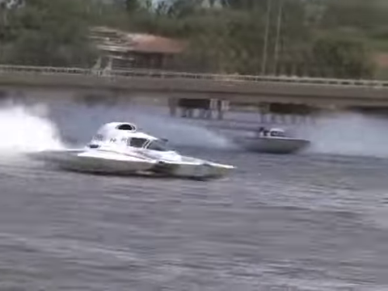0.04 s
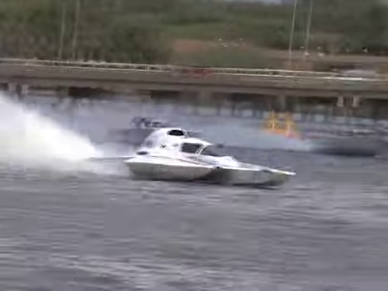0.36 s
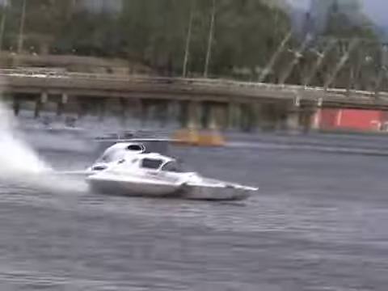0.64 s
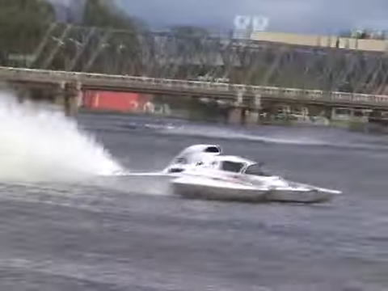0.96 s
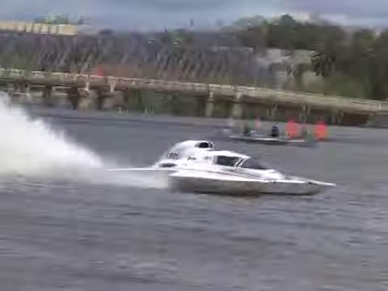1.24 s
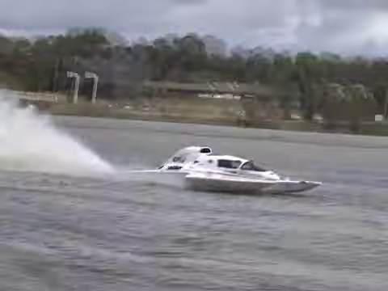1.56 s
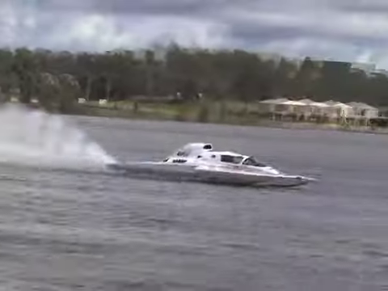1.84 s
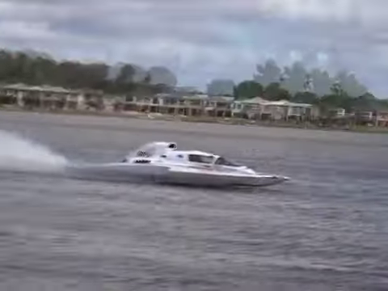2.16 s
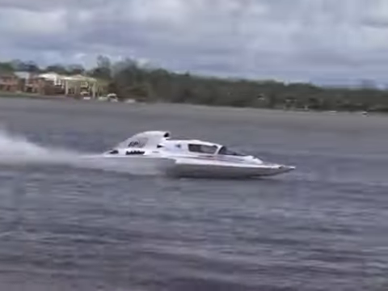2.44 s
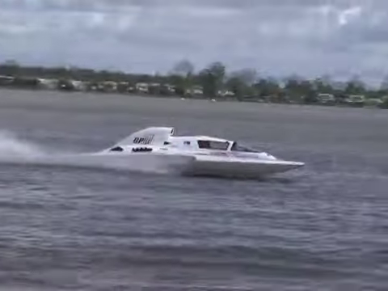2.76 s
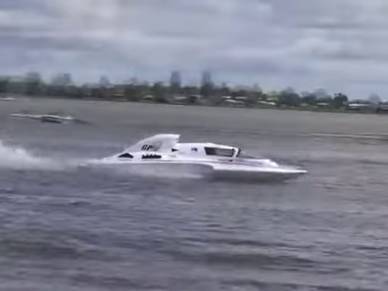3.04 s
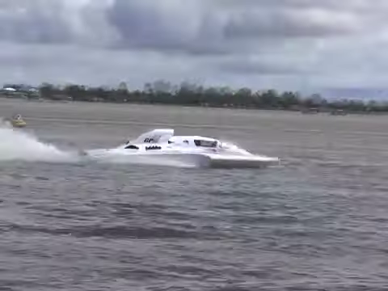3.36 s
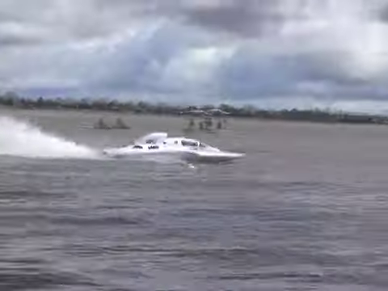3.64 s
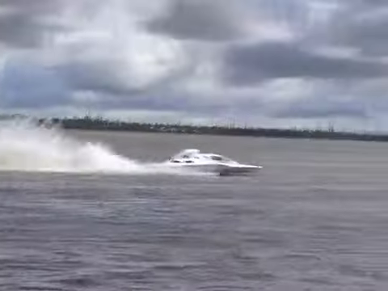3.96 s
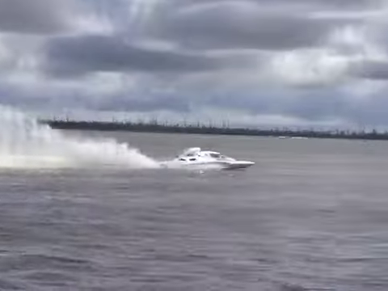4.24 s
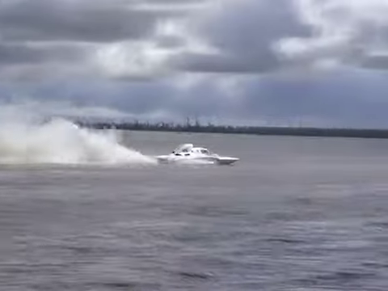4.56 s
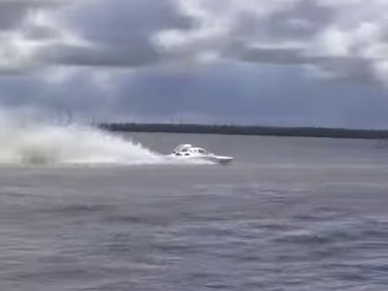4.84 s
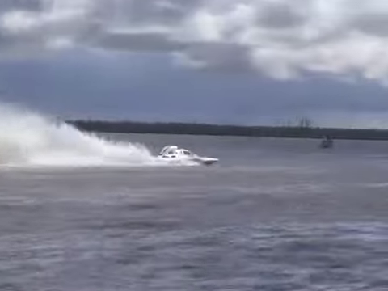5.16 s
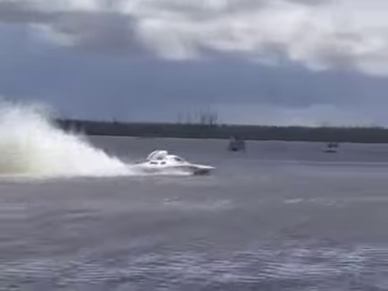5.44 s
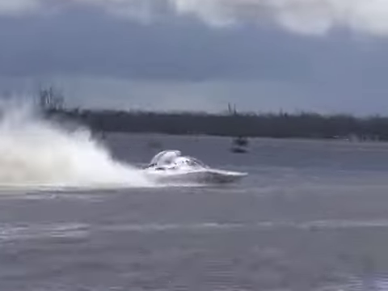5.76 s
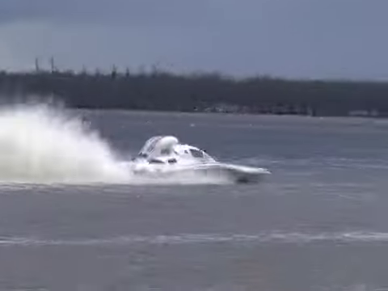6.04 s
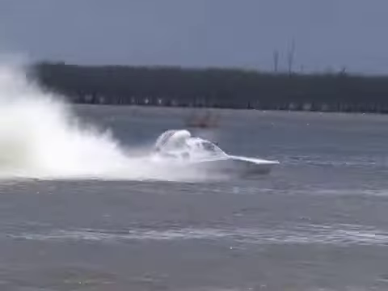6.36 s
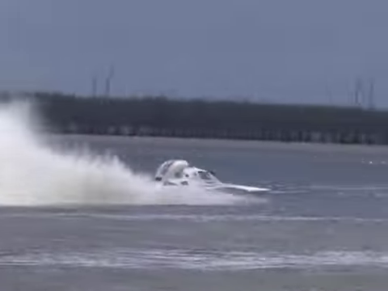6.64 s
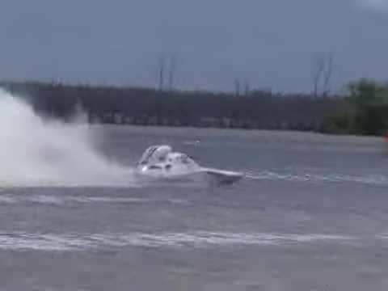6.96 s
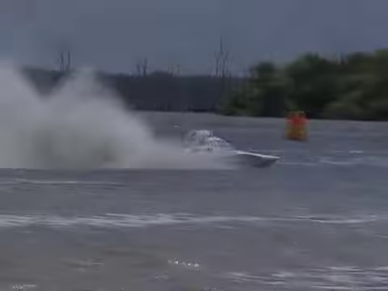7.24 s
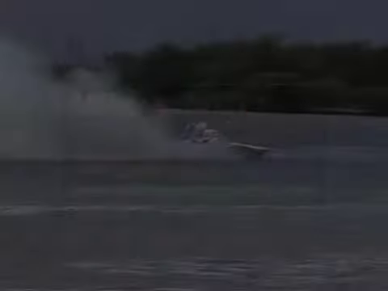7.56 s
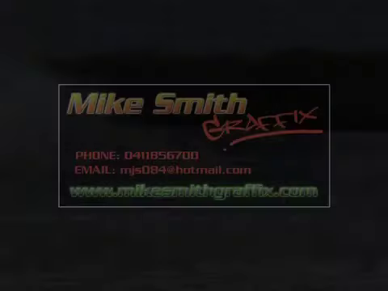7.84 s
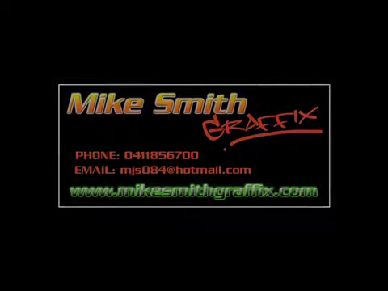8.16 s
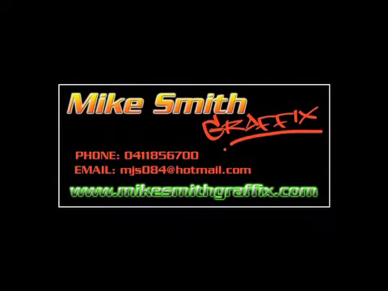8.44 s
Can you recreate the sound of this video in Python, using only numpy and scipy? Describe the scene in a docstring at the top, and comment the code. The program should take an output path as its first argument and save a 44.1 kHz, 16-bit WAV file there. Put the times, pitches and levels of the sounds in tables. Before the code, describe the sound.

A racing boat booms closer across a river, its revs jumping again and again. About halfway it passes: the pitch drops and the open exhaust crackles, then barks as it leaves. A second boat takes over with a steady drone, sheets of spray splash, something rattles briefly, and the sound fades out. The far bank echoes the engines, and a little wind rumbles on the microphone.

```python
"""A V8 racing boat booms closer on a river, its revs jumping each time the propeller lifts out.
Near 4 s it passes: the pitch falls, and its open exhaust pipes crackle, then bark as it leaves.
From about 5 s a second boat takes over with a steady drone. Sheets of spray splash after 6 s,
something rattles briefly, and the sound fades out. All along, the far bank echoes the boats
and a little wind rumbles."""
import sys
import numpy as np
from scipy import signal
from scipy.fft import rfft, irfft, next_fast_len
from scipy.io import wavfile
from scipy.ndimage import map_coordinates

SR = 44100
rng = np.random.default_rng(int(sys.argv[2]) if len(sys.argv) > 2 else 0)


def wrap_up_sound(samples):
    """Save the sound to the file named by the first command line argument, as 16-bit audio."""
    columns = np.atleast_2d(samples).T
    # keep every value between -1 and 1, then stretch to whole-number steps
    tamed = np.clip(columns, -1, 1)
    steps = np.round(tamed * 32767).astype(np.int16)
    wavfile.write(sys.argv[1], SR, steps)


N = 384111
TIME = np.arange(N) / SR

# When one side of a V8 fires, in eighths of an engine cycle
FIRING_EIGHTHS = np.array([0, 2, 3, 5])
# Which way the boat faces us, and how much duller its bark sounds when far away:
# time_s, side (0 front, 1 side-on, 2 back), dulling_db_per_harmonic
BOAT_VIEW = [(0, 0, -.3), (.7, 0, -.3), (1.0, 0, 0), (2.1, .1, 0), (2.7, .95, 0), (3.3, 1.1, 0),
             (3.9, 2, 0), (4.85, 2, -.1), (5.4, 2, -.9), (8, 2, -1.1)]
# Hiss of the exhaust jets: time_s, rasp_db, crackle_db, crackle_treble_db
JET_LEVELS = [(0, -23.5, -27.5, -6.5), (.7, -27.5, -28, -5.5), (.95, -24, -20.5, -7.5),
              (1.8, -24.5, -24, -1.5), (2.4, -27, -22.5, 1.5), (2.85, -22, -21, 2), (3.15, -26, -19, 2.5),
              (3.7, -21.5, -20.5, -1), (4.05, -22, -27.5, 1), (4.6, -29, -31, -1.5),
              (5.2, -32.5, -32.5, -6.5), (5.7, -30.5, -37.5, -6), (6.3, -32.5, -35, -12),
              (6.75, -31, -34.5, -16), (7.2, -35, -33.5, -11), (7.7, -32.5, -33, -14.5), (8, -25, -25, -26)]


def racing_boat():
    """The main boat: an engine note plus the noise of gas puffing out of its pipes."""
    surge_hz = propeller_surge()
    cycle_hz = 46.65 * doppler(speed_m_s=38.7, nearest_m=58.4, nearest_s=3.73) + surge_hz
    cycles = np.cumsum(cycle_hz * (1 + .003 * walk(30))) / SR
    tone = exhaust_tone(cycles, surge_hz)
    # Brief flare-ups of the exhaust: peak_s, half_length_s, rise_db
    flares = [(0, .05, 4), (.24, .07, 2.5), (0.488, .06, 6), (0.613, 0.062, 6.5), (1.1, .05, 1.5),
              (1.231, .04, 1), (1.4, .05, 1), (1.626, .06, 6), (2.12, .06, 5), (2.352, .04, 4),
              (2.505, .04, 3), (2.845, .08, 2), (3.15, .06, 5), (3.279, .03, 0), (3.5, .04, 4.5),
              (3.744, .05, 4.5), (4.344, .04, 1), (4.823, .06, 5), (5.1, .05, 3), (5.453, .05, 2),
              (5.79, .04, 4), (7.391, .07, 1)]
    flare_db = sum(rise_db * swell(peak_s, width_s) for peak_s, width_s, rise_db in flares)
    # Spray and water scatter the sound and blur the puffs: time_s, scattered_share (0 to 1)
    scattering = [(0, 0.18), (1.5, 0.28), (3.1, 0), (4.5, 0.16), (5.3, 0.6), (6.2, 0.56), (8, 0.5)]
    scattered, = curves(scattering)
    puffs = gas_puffs(cycles, decay_s=.0031, spread_db=1.48, jitter_s=.0001)
    flow = np.sqrt((1 - scattered) * puffs ** 2 + scattered)
    return tone + exhaust_roar(flow) + exhaust_rasp(puffs, surge_hz, flare_db) + crackle(flow, flare_db)


def propeller_surge():
    """Extra engine cycles a second: the revs race with the propeller out and drop as it bites again."""
    # Skips of the hull: start_s, length_s, gain_hz (negative where it digs in)
    skips = [(-.03, 0.13, 3), (.23, .06, 2.5), (.49, .17, 6.5), (.68, 0.067, -7.5), (.87, .12, 2.5),
             (.966, 0.041, 12.5), (1.267, .23, 4.5), (1.615, .07, 7), (1.737, .11, 7.5), (2.042, 0.12, 8.5),
             (2.41, .18, 7), (2.76, .22, 2.5), (2.93, .09, 5.5), (3.213, 0.067, 9), (3.38, 0.1, -2),
             (3.575, 0.067, 8), (3.76, .08, -1.5), (3.897, .11, 5.5), (4.262, .19, 5), (4.74, .1, 7),
             (5.32, 0.19, 4.5), (5.69, .33, 3), (6.232, .08, 7), (6.64, .2, 5), (7.415, 0.61, 3)]
    race_s, bite_s = .066, .072
    surge_hz = np.zeros(N)
    for start_s, length_s, gain_hz in skips:
        age = TIME - start_s
        racing = 1 - np.exp(-np.clip(age, 0, length_s) / race_s)
        dropping = np.exp(-np.clip((age - length_s) / bite_s, 0, 10) ** 2)
        surge_hz += gain_hz * racing * dropping
    return surge_hz


def doppler(speed_m_s, nearest_m, nearest_s):
    """Pitch factor: sound waves bunch up as the boat comes and stretch out as it leaves."""
    along_m = speed_m_s * (TIME - nearest_s)
    return 1 / (1 + speed_m_s / 343 * along_m / np.hypot(along_m, nearest_m))


def exhaust_tone(cycles, surge_hz):
    """A low boom, and a bark that changes as the pipes turn toward us and grows as the revs race."""
    # Strength of the note: time_s, boom_db, bark_db
    tone_levels = [(0, -19, -20.5), (.45, -16, -20.5), (.75, -19, -20.5), (1.65, -19, -22.5),
                   (1.85, -15.5, -23), (2.1, -14.5, -21), (2.3, -19, -21), (3.0, -21.5, -18.5),
                   (3.6, -19, -17.5), (4.2, -20, -13.5), (4.9, -22.5, -16), (5.3, -29.5, -17),
                   (5.6, -24.5, -20), (5.85, -27, -18.5), (6.3, -29, -24.5), (6.8, -31, -22.5),
                   (7.2, -31, -23), (8, -28, -23)]
    # Balance of the bark from each side: harmonic, front_db, side_db, back_db
    harmonics = [(4, -8, -15, -16), (5, -5, -5, -.7), (6, 0, -6, -6), (7, -3, -3, -7), (8, -4, -1, -2),
                 (9, 0, -5, -4), (10, -1, -7, -4), (11, -2, 2, -11), (12, -6, -7, -9), (13, -8, -3, 1.5),
                 (14, -12, -11, -5), (15, -6, -11, -11), (16, -14, -6, -9), (17, -8, -14, -13),
                 (18, -2, -8, -18), (19, -10, -6, -24), (20, -1, -15, -17), (21, -9, -22, -12),
                 (22, -6, -20, -18), (23, 2.5, -17, -23), (24, -6, -20, -29), (26, -3, -20, -26),
                 (28, -9, -10, -28), (29, -16, -10, -28), (30, -18, -11, -21), (31, -12, -11, -30)]
    boom_db, bark_db = curves(tone_levels)
    side, dulling_db = curves(BOAT_VIEW)
    numbers, balance_db = np.array(harmonics)[:, 0], np.array(harmonics)[:, 1:]
    shares_db = balance_db - 10 * np.log10(np.sum(undb(balance_db) ** 2, axis=0))
    bark = 0
    for k, share_db in zip(numbers, shares_db):
        gain = np.interp(side, np.arange(3), undb(share_db)) * undb(dulling_db * (k - 8))
        # Short waves get scrambled more, so high harmonics are the roughest.
        bark += gain * harmonic(cycles, k, waver=.17 + .0003 * k ** 2, waver_hz=10 + .08 * k ** 2)
    boom = harmonic(cycles, 3, waver=.13, waver_hz=22)
    return -np.sqrt(2) * (undb(boom_db) * boom + undb(bark_db + .22 * surge_hz) * bark)


def harmonic(cycles, k, waver, waver_hz):
    """One tone at k times the engine's cycle rate; reflections off moving water make it waver."""
    firing_phase = np.angle(np.exp(-2j * np.pi * k * FIRING_EIGHTHS / 8).sum() + 1e-6)
    pipe_lag = .11 * k ** 2  # the pipes delay high harmonics more than low ones
    angle = 2 * np.pi * (k * cycles % 1) + firing_phase - pipe_lag
    return (1 + waver * walk(waver_hz)) * np.cos(angle) + waver * walk(waver_hz) * np.sin(angle)


def gas_puffs(cycles, decay_s, spread_db, jitter_s):
    """Every firing pushes a sharp, uneven puff of gas through the pipes."""
    firings = (np.arange(int(cycles[-1]))[:, None] + FIRING_EIGHTHS / 8).ravel()
    chance = rng.standard_normal((2400, 2))[:len(firings)]
    start_s = np.interp(firings, cycles, TIME) + jitter_s * chance[:, 0]
    cylinder_db = np.resize([-3.5, -2, -6, -1], len(firings))  # a puff close behind another is weaker
    strength = undb(cylinder_db + spread_db * chance[:, 1])
    kicks = np.bincount(np.clip(start_s * SR, 0, N - 1).astype(int), strength, N)
    return unit(signal.lfilter([1], [1, -np.exp(-1 / (decay_s * SR))], kicks))


def exhaust_roar(flow):
    """Fuel burning unevenly makes a low roar."""
    # Strength of the roar: time_s, level_db
    roar_levels = [(0, -20), (.55, -19), (.95, -23), (1.7, -25.5), (2.2, -22), (3.1, -24.5), (4.4, -19.5),
                   (5.4, -22.5), (6.8, -20), (8, -23.5)]
    # Its tone colour: pitch_hz, level_db
    roar_colour = [(50, -41), (85, -10), (125, 0.5), (190, -3), (260, -3.5), (350, 0), (560, 1),
                   (720, -7.5), (1000, -14.5), (2000, -52), (16000, -110)]
    level_db, = curves(roar_levels)
    return colour(flow * rng.standard_normal(N), roar_colour) * undb(level_db)


def exhaust_rasp(puffs, surge_hz, flare_db):
    """Each puff rasps: more in a flare-up, less while the revs race."""
    # Tone colour from the front: pitch_hz, level_db
    front_colour = [(400, -27), (700, -10), (950, -0.5), (1130, -3.5), (1350, 0), (1750, -8.5),
                    (2300, -9.5), (4000, -54), (16000, -100)]
    # From the side and behind: pitch_hz, level_db
    side_colour = [(400, -28), (700, -10.5), (950, 0.5), (1170, -4), (1520, -2), (1850, -6), (2300, -7.5),
                   (4000, -50.5), (16000, -100)]
    rasp_db, _, _ = curves(JET_LEVELS)
    turned = np.clip(curves(BOAT_VIEW)[0], 0, 1)
    front = np.sqrt(1 - turned) * colour(puffs * rng.standard_normal(N), front_colour)
    side = np.sqrt(turned) * colour(puffs * rng.standard_normal(N), side_colour)
    return (front + side) * undb(rasp_db - .22 * surge_hz + .25 * flare_db)


def crackle(flow, flare_db):
    """The puffs sharpen into tiny shock waves that crackle."""
    # Tone colour of the crackle: pitch_hz, level_db
    crackle_colour = [(1100, -25), (1900, -4), (2150, -2), (2480, 2.5), (3050, -2), (3450, -.5),
                      (3850, -2.5), (4600, .5), (5600, -3.5), (7200, -7.5), (10000, -16), (15000, -33)]
    _, crackle_db, treble_db = curves(JET_LEVELS)
    shocks = unit((rng.random(N) < 9000 / SR) * rng.standard_normal(N))
    sound = colour(flow * (shocks + .97 * rng.standard_normal(N)), crackle_colour)
    flutter_db = .7 * walk(28)  # gusty air makes the treble flutter
    top_db = treble_db + .45 * flare_db + flutter_db
    sound = tilt_treble(sound * undb(flutter_db), top_db, knee_hz=4000, top_hz=8900)
    return undb(crackle_db + flare_db) * sound


def second_boat():
    """A faster-revving engine further off drones evenly."""
    # The engine's run: time_s, cycle_hz, level_db
    run = [(3.8, 72.5, -49.5), (4.7, 72, -28.5), (5.0, 72.0, -23), (5.35, 68.96, -17), (5.6, 69.8, -21),
           (6.2, 68.4, -15), (6.8, 66.76, -15), (7.2, 67.2, -18.5), (7.6, 65.7, -17), (8.0, 64.4, -20.5)]
    # Balance of its drone: harmonic, level_db
    harmonics = [(2, -12), (3, -2.5), (5, -1.5), (6, -16), (7, -15), (8, 1), (9, -14), (11, -13), (12, -17),
                 (13, -24), (15, -23), (16, -16), (17, -25), (18, -26), (22, -26), (23, -27), (24, -28),
                 (25, -26), (26, -28), (27, -29)]
    cycle_hz, level_db = curves(run)
    cycles = np.cumsum(cycle_hz * (1 + .0015 * walk(18))) / SR
    tone = sum(undb(db) * harmonic(cycles, k, waver=.22 + .01 * k, waver_hz=8) for k, db in harmonics)
    return unit(tone) * undb(level_db)


def spray():
    """The hull slaps down and throws sheets of spray that fall back on the water."""
    # Sheets of spray: peak_s, half_length_s, level_db
    splashes = [(6.08, 0.12, -29.5), (6.699, 0.21, -31), (7.392, .1, -30)]
    # Their tone colour: pitch_hz, level_db
    splash_colour = [(400, -18.5), (800, -2), (1200, 5), (1900, 2.5), (2900, -1.5), (4500, -12.5),
                     (8000, -23), (11000, -33.5), (16000, -56)]
    loudness = sum(undb(level_db) * swell(peak_s, width_s) for peak_s, width_s, level_db in splashes)
    return loudness * colour(rng.standard_normal(N) * undb(1.8 * walk(60)), splash_colour)


def rattle(peak_s, width_s, level_db):
    """A short, dry rattle from far off, 112 beats a second."""
    beats = np.exp(-(TIME * 112 % 1) / .3) * undb(2.5 * walk(100))
    # pitch_hz, level_db
    dry_colour = [(1200, -13), (2600, 2), (3600, 2.5), (5000, -3), (6300, -24), (10500, -28),
                  (16000, -62)]
    return colour(beats * rng.standard_normal(N), dry_colour) * undb(level_db) * swell(peak_s, width_s)


def far_bank(sound, delay_s, ring_s, dull_hz, level_db):
    """Trees and a bridge send back a late, dull wash of echoes."""
    age = TIME[:SR * 2] - delay_s
    tail = rng.standard_normal(len(age)) * (age > 0) * undb(-60 * np.abs(age) / ring_s)
    tail = signal.sosfilt(signal.butter(2, dull_hz, fs=SR, output="sos"), tail / np.linalg.norm(tail))
    return undb(level_db) * signal.fftconvolve(sound, tail)[:N]


def wind(gust_db):
    """Soft gusts of wind make a low rumble."""
    # Strength of the wind: time_s, level_db
    wind_levels = [(0, -51), (1, -53), (2.2, -45.5), (4.2, -43.5), (5.2, -47), (6.1, -45), (8, -48.5)]
    # Its tone colour: pitch_hz, level_db
    wind_colour = [(20, -13), (32, -28), (48, 6), (62, 5.5), (100, -13.5), (300, -24.5), (1000, -51)]
    level_db, = curves(wind_levels)
    return colour(rng.standard_normal(N), wind_colour) * undb(level_db + gust_db * walk(3.7))


def undb(db):
    """Turn decibels into a volume factor."""
    return 10 ** (np.asarray(db) / 20)


def unit(sound):
    """Scale to an average power of 1."""
    return sound / np.sqrt(np.mean(sound ** 2))


def curves(table):
    """Join a table's timed rows with straight lines, one curve for each value column."""
    time_s, *columns = np.transpose(table)
    return [np.interp(TIME, time_s, column) for column in columns]


def swell(peak_s, width_s):
    """A smooth rise and fall with a peak of 1."""
    return np.exp(-np.minimum(np.abs(TIME - peak_s) / width_s, 10) ** 2)


def walk(rate_hz):
    """A smooth random wobble of size near 1 that changes about rate_hz times a second."""
    points = rng.standard_normal(2000)
    coarse = map_coordinates(points, [TIME[::64] * rate_hz], order=3, mode="wrap")
    return np.interp(TIME, TIME[::64], coarse)


def colour(sound, points):
    """Shape bass and treble along (pitch_hz, level_db) points; the result has a power of 1."""
    size = next_fast_len(N + 8192, True) // 2 * 2
    pitch_hz, level_db = np.transpose(points)
    hz = np.maximum(np.fft.rfftfreq(size, 1 / SR), 1)
    cepstrum = irfft(np.log(undb(np.interp(np.log(hz), np.log(pitch_hz), level_db))))
    # Keep the first half only, so the filter rings after a sound and never before it.
    cepstrum[1:size // 2] *= 2
    cepstrum[size // 2 + 1:] = 0
    return unit(irfft(rfft(sound, size) * np.exp(rfft(cepstrum)))[:N])


def tilt_treble(sound, top_db, knee_hz, top_hz):
    """Air and spray change how much treble arrives: no change up to knee_hz, top_db at top_hz."""
    hz, time_s, spectrum = signal.stft(sound, SR, nperseg=512)
    depth = np.maximum(hz - knee_hz, 0) / (top_hz - knee_hz)
    gain = undb(np.outer(depth, np.interp(time_s, TIME, top_db)))
    return signal.istft(spectrum * gain, SR)[1][:N]


def scene():
    """Mix the sounds on the river, their echo and the wind into one channel."""
    river = racing_boat() + spray() + second_boat() + rattle(peak_s=7.38, width_s=.07, level_db=-28)
    echo = far_bank(river, delay_s=.077, ring_s=1.9, dull_hz=1500, level_db=-12.5)
    return (river + echo + wind(gust_db=1.6))[None]


def record(dry):
    """Round off the loudest peaks, fade out the end and cut the highest treble."""
    fade_start_s, fade_end_s, top_hz = 7.256, 8.086, 15750
    fade = np.clip((fade_end_s - TIME) / (fade_end_s - fade_start_s), 0, 1)
    rounded = dry / (1 + (dry / .88) ** 6) ** (1 / 6)
    return signal.sosfilt(signal.ellip(10, .1, 80, top_hz, fs=SR, output="sos"), rounded * fade)


dry = scene()
out = record(dry)
wrap_up_sound(out)
```